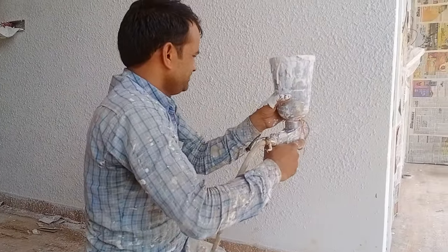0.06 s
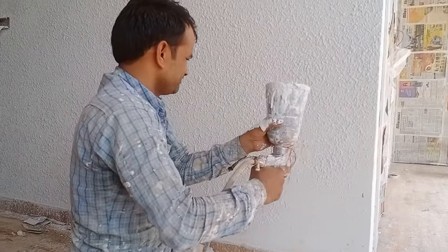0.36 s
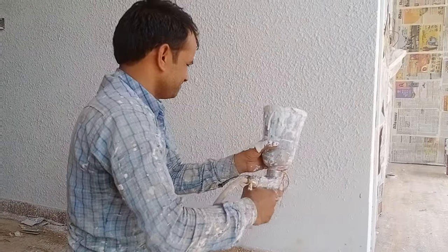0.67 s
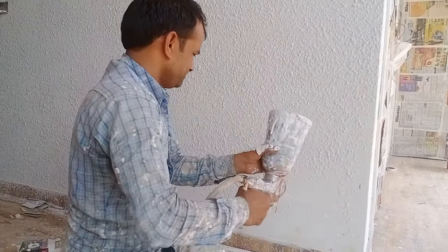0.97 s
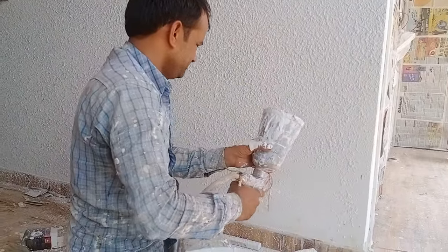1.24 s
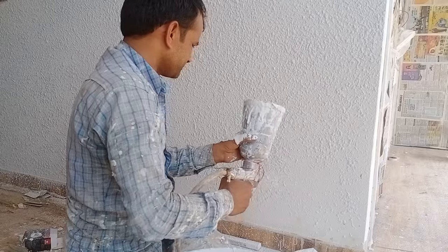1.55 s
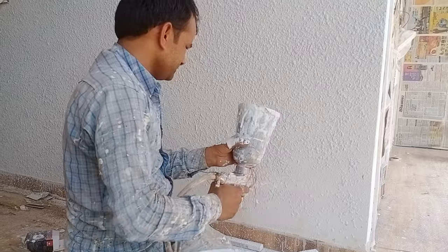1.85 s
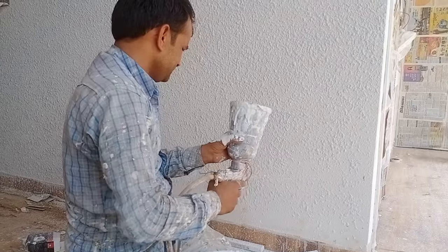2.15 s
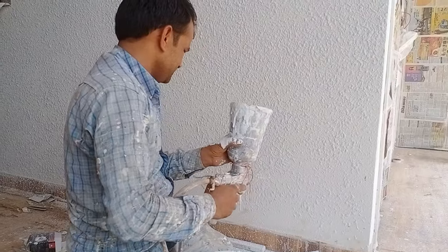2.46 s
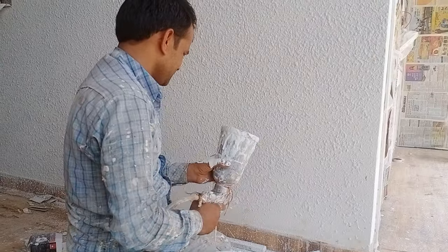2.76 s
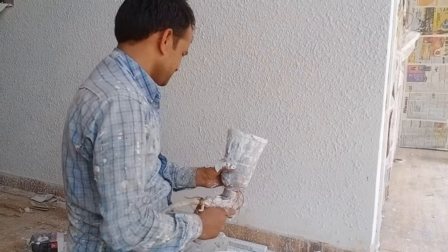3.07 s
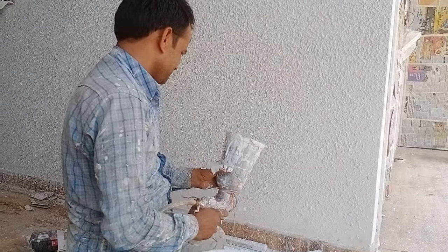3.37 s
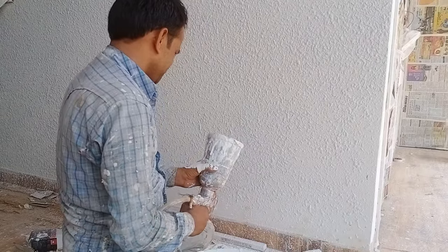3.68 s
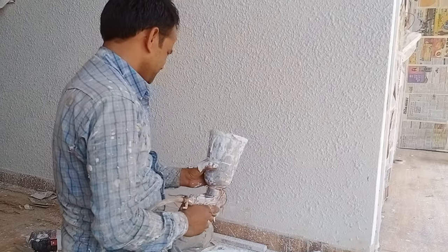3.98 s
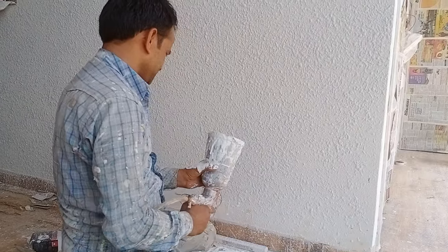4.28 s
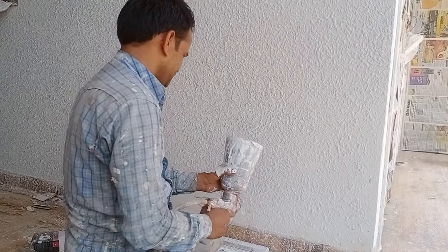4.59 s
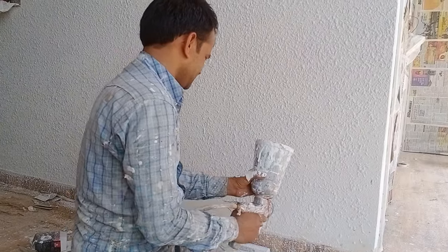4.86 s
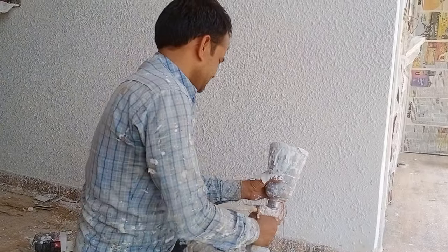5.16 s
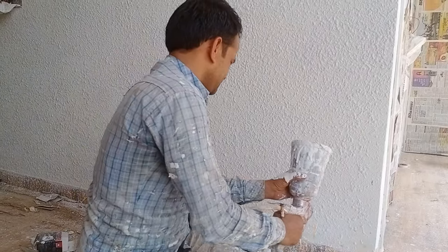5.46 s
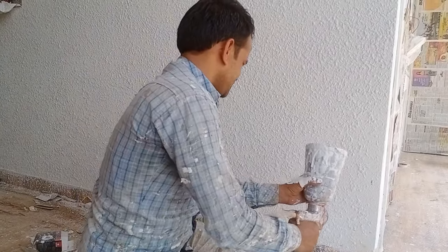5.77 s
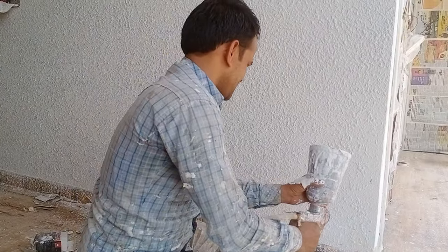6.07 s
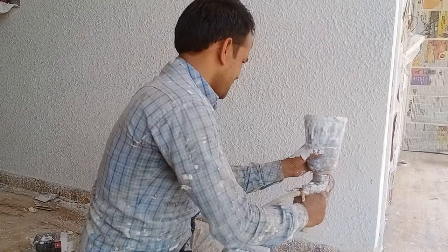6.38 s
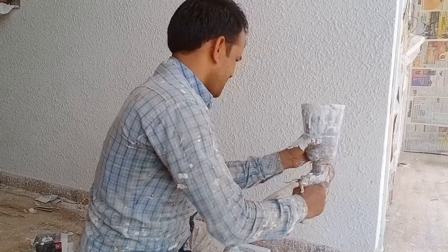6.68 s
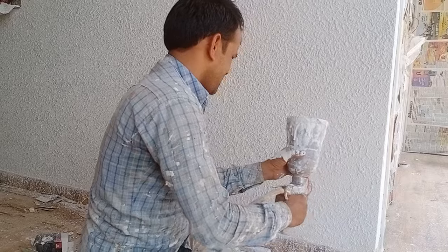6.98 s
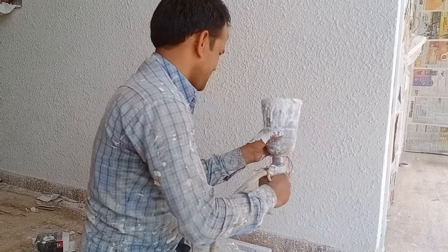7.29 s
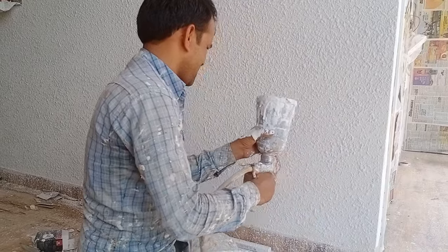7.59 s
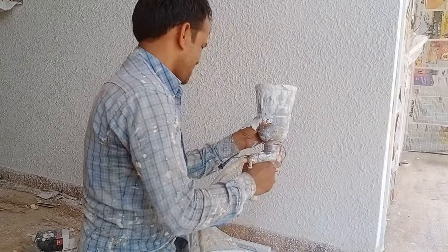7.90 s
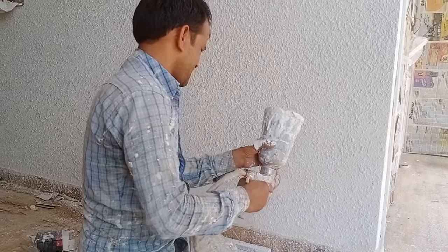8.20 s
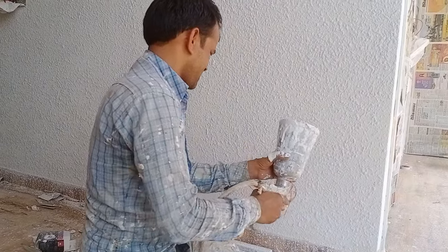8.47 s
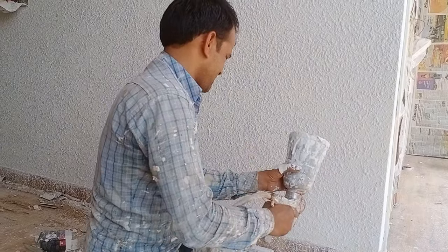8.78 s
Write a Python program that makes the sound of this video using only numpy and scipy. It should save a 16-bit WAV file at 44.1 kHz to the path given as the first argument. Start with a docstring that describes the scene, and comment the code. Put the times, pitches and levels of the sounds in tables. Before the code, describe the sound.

Continuous close hiss of an air spray gun coating a wall, its tone shifting over a faint low roar.

```python
"""A hopper gun blows wet wall texture onto a porch wall with compressed air, in one unbroken blast.
The jet hisses and sputters as lumps of paste pass the nozzle. Close echoes and ringing tones shift as
the gun sweeps down the wall and up again. Behind it, the spray roars on the wall, the porch booms
faintly and a draught rumbles past the one nearby microphone."""
import sys
import numpy as np
from scipy import signal
from scipy.fft import rfft, irfft, next_fast_len
from scipy.io import wavfile

SR = 44100
rng = np.random.default_rng(int(sys.argv[2]) if len(sys.argv) > 2 else 0)


def waveform_to_disk(signal):
    """Save audio, clipped to [-1, 1], as 16-bit WAV at the path in sys.argv[1]."""
    frames = np.transpose(np.atleast_2d(signal))
    scaled = np.clip(frames, -1, 1) * 32767
    samples = np.round(scaled).astype(np.int16)
    wavfile.write(sys.argv[1], SR, samples)


N = 389844
TIME = np.arange(N) / SR

# the gun's sweep down and up the wall: (time [s], height [m])
GUN_HEIGHT = [(0, 0.395), (.5, 0.382), (1, 0.205), (2, 0.311), (3, 0.219), (4, 0.067), (5, 0.03),
              (6, 0.024), (6.5, 0.156), (7, 0.224), (8, 0.233), (8.84, 0.11)]


def from_db(db):
    """Turn decibels into a number to multiply a sound by."""
    return np.exp(np.asarray(db) * (np.log(10) / 20))


def rms_one(x):
    """Scale a signal so that its average strength (rms) is 1."""
    return x / np.sqrt(np.mean(x ** 2) + 1e-20)


def in_time(rows):
    """Join a table's points with straight lines: one curve for each column after the time."""
    times, *columns = np.transpose(rows)
    return [np.interp(TIME, times, column) for column in columns]


def swell(middle_s, length_s):
    """A smooth rise to 1 and fall again."""
    return np.exp(-2 * np.minimum(((TIME - middle_s) / length_s) ** 2, 20))


def drift(rate_hz):
    """A smooth random wobble of typical size 1; a higher rate makes it quicker."""
    step, warm_up = 40, 2000
    r = np.exp(-2 * np.pi * step * rate_hz / SR)
    noise = rng.standard_normal(N // step + warm_up + 2)
    slow = signal.lfilter([1], [1, -2 * r, r * r], noise)[warm_up:]
    return np.interp(np.arange(N) / step, np.arange(len(slow)), rms_one(slow))


def filtered(x, gain_at):
    """Turn each frequency of x up or down by gain_at(frequency in Hz)."""
    size = next_fast_len(N + SR // 10)
    hz = np.arange(size // 2 + 1) * SR / size
    return irfft(rfft(x, size) * gain_at(hz), size)[:N]


def coloured(x, spectrum):
    """Give x the tone colour in a table, with nothing beyond its ends; strength 1."""
    hz, db = np.transpose(spectrum)
    shaped = filtered(x, lambda f: from_db(np.interp(np.log(f + 1), np.log(hz), db, -np.inf, -np.inf)))
    return rms_one(shaped)


def blown(hz, width_hz):
    """Rushing air makes something ring: noise around one pitch, purer when narrow; strength 1."""
    r = np.exp(-np.pi * width_hz / SR)
    band = [1 - r, 0, r - 1, 1, -2 * r * np.cos(2 * np.pi * hz / SR), r * r]
    return rms_one(signal.sosfilt([band, band], rng.standard_normal(N + SR // 2))[-N:])


def wall_wash(waver_db, gust_db, puff_boom_db):
    """The jet roars on the wall, sets the porch booming and sends a draught past the microphone."""
    # the jet on the wall: (time [s], roar [dB], lowest porch note [dB], upper porch notes [dB])
    wash_levels = [(0, -26, -38.5, -34), (.9, -27.5, -44.5, -32), (2.3, -27.5, -46, -32),
                   (2.6, -28, -52, -38.5), (4.2, -30.5, -51, -39.5), (5.2, -28.5, -49.5, -42.5),
                   (6.8, -28, -45.5, -37), (8.0, -29, -39.5, -37), (8.84, -28.5, -48, -37.5)]
    # tone colour of the roar: (frequency [Hz], relative level [dB])
    roar_colour = [(165, -29), (195, -2.5), (330, -2.5), (430, -4.5), (600, -4.5), (900, -1), (1100, 0.5),
                   (1350, 3), (1600, 2), (1900, -0.5), (2150, -17), (2600, -36)]
    # notes of the air in the porch, lowest first: (pitch [Hz], width [Hz], relative level [dB])
    porch_notes = [(190.1, 11.3, 1.5), (249.6, 13.6, -2), (304.6, 17.5, -6)]
    # rumble of the draught: (time [s], level [dB])
    draught_levels = [(0, -54.2), (2.2, -53), (2.6, -64), (4.4, -61), (5.1, -57), (8.84, -57)]
    # puffs of air thrown back by the wall: (middle [s], length [s], rumble level [dB])
    air_puffs = [(.19, 0.1, -51), (1.348, .13, -55), (2.03, 0.067, -57), (2.994, 0.059, -56),
                 (3.447, 0.045, -58), (3.8, 0.14, -45), (5.63, 0.11, -51), (6.463, 0.081, -50),
                 (7.04, 0.044, -54), (7.433, 0.075, -50), (7.853, .1, -55), (8.249, 0.088, -51)]
    # tone colour of the rumble: (frequency [Hz], relative level [dB])
    rumble_colour = [(20, -24), (45, -11), (62, -9.5), (91, 7), (115, 2), (145, 0), (200, -8)]
    roar_db, lowest_db, upper_db = in_time(wash_levels)
    draught_db, = in_time(draught_levels)
    puffs = sum(from_db(db) * swell(s, length) for s, length, db in air_puffs)
    roar_db = roar_db + waver_db * drift(rate_hz=6.6)   # the jet crosses rough plaster
    roar = from_db(roar_db) * coloured(rng.standard_normal(N), roar_colour)
    lowest, *upper = [from_db(db) * blown(hz, width) for hz, width, db in porch_notes]
    lowest_gain = from_db(lowest_db) + from_db(puff_boom_db) * puffs   # each puff lifts the lowest note
    boom = lowest_gain * lowest + from_db(upper_db) * sum(upper)
    gusts = rng.standard_normal(N) * from_db(gust_db * drift(rate_hz=18))
    rumble = (from_db(draught_db) + puffs) * coloured(gusts, rumble_colour)
    return roar + boom + rumble


def gun_rings():
    """The gun and its hopper ring faintly and steadily in the stream of air."""
    # notes of gun and hopper: (pitch [Hz], width [Hz], level [dB])
    notes = [(430.2, 15.4, -46.5), (504.4, 20, -51), (624, 8.7, -55), (806, 35, -45), (907, 18, -44),
             (997, 20, -46.5), (1165, 17, -44), (1699, 11, -42.5), (2088, 27, -43.5), (2464, 31, -41.5),
             (3208, 67, -42)]
    return sum(from_db(db) * blown(hz, width) for hz, width, db in notes)


def gap_tones(level_db, fade_s):
    """The gap between painter, gun and wall rings with different notes as each pose comes and goes."""
    # four poses (gun high, tucked in low, reaching out, drawing back):
    # (start [s], end [s], list of (pitch [Hz], width [Hz], relative level [dB]))
    poses = [ (-.5, 2.5, [(400, 110, -39), (696, 140, -39), (1045, 150, -33), (1266, 57, -34),
             (1670, 110, -42), (2480, 200, -34), (3200, 1500, -32.5)]), (2.751, 5.13, [(330, 96, -39),
             (503, 220, -40.5), (795, 75, -38.5), (1285, 130, -38.5), (1517, 45, -36.5), (1743, 110, -33),
             (3030, 230, -32), (4130, 220, -36), (4750, 300, -37), (6350, 300, -36)]),
             (5.55, 8.17, [(1187, 94, -33), (2400, 200, -42), (3230, 300, -34.5), (4150, 250, -38),
             (5680, 200, -37), (6530, 590, -34)]), (8.2, 9.1, [(1180, 200, -34), (1540, 120, -40),
             (4020, 250, -35), (5700, 200, -33), (6300, 220, -31)])]
    out = 0
    for start, end, notes in poses:
        held = (np.tanh((TIME - start) / fade_s) - np.tanh((TIME - end) / fade_s)) / 2
        out = out + held * sum(from_db(db + level_db) * blown(hz, width) for hz, width, db in notes)
    return out


def flares():
    """One pitch rises and fades in the hiss as the gun passes the spot that makes it ring."""
    # passing tones: (middle [s], length [s], pitch [Hz], width [Hz], top level [dB])
    tones = [(.48, 0.26, 1750, 220, -27.5), (1.43, .12, 4930, 700, -29), (2.53, .09, 6120, 400, -24),
             (2.78, .12, 4100, 600, -25), (3.46, .18, 2930, 250, -27.5), (3.95, .2, 6350, 250, -31),
             (4.3, 1.1, 8060, 1300, -37), (4.42, .22, 6420, 250, -29), (4.48, .2, 7500, 500, -34),
             (5.15, 0.7, 6380, 380, -28.5), (5.3, 0.8, 1250, 220, -33), (4.1, 1.2, 796, 80, -38),
             (6.35, 1.15, 1200, 90, -33), (5.82, .14, 6780, 250, -31), (7.22, 0.15, 3250, 400, -24),
             (7.32, .1, 12000, 2000, -30), (7.52, .4, 3480, 420, -28), (8.05, .35, 2570, 200, -29),
             (8.3, .14, 3950, 500, -28.5), (8.65, .35, 6600, 500, -28)]
    return sum(from_db(db) * swell(s, length) * blown(hz, width) for s, length, hz, width, db in tones)


def near_echoes(x, echoes_db, decay_ms, ms_per_m, flicker_db, count):
    """Wall, floor and painter add weak echoes that follow the gun, so ripples slide through the hiss."""
    # the gun's travel along the wall: (time [s], position [m])
    gun_sideways = [(0, .21), (1, .19), (2, .07), (3, .04), (4, 0), (4.5, .02), (5, .17), (6, .34),
                    (7, .25), (8, .16), (8.84, .25)]
    height, = in_time(GUN_HEIGHT)
    sideways, = in_time(gun_sideways)
    up_m, along_m = height - height.mean(), sideways - sideways.mean()
    delays_ms = np.geomspace(2.5, 16, count) * rng.uniform(.95, 1.05, count)
    gains = from_db(echoes_db) * rms_one(np.exp(-delays_ms / decay_ms)) / np.sqrt(count)
    out = x
    for delay_ms, gain, angle in zip(delays_ms, gains, rng.uniform(0, 2 * np.pi, count)):
        moved_m = np.cos(angle) * up_m + np.sin(angle) * along_m
        sent_s = TIME - (delay_ms + ms_per_m * moved_m) / 1000
        # the wavering jet aims more or less of its sound down each path
        aim = rms_one(from_db(flicker_db * np.tanh(drift(rate_hz=3.2))))
        out = out + gain * aim * np.interp(sent_s, TIME, x, left=0)
    return rms_one(out) * np.std(x)


def swirl(x, level_db, above_hz, count):
    """Hopper, hands and sleeve bounce the treble back; the tone swirls as the gun wobbles."""
    treble = filtered(x, lambda f: .5 + .5 * np.tanh((f - above_hz) / 2000))
    lags = (np.geomspace(.7, 2.6, count) * SR / 1000).astype(int)   # 0.7 to 2.6 ms late
    bounces = sum(drift(rate_hz=2.2) * np.pad(treble, (lag, 0))[:N] for lag in lags)
    return rms_one(x + from_db(level_db) * bounces / np.sqrt(count)) * np.std(x)


def nozzle_rasp(swing_db, rate_hz, threshold, height_db_per_m):
    """Hoarse tones catch for moments on the nozzle's wet rim, louder with the gun held low."""
    # tones of the nozzle: (pitch [Hz], width [Hz], level at average gun height [dB])
    tones = [(3300, 1550, -36), (5750, 650, -32), (6420, 830, -34)]
    height, = in_time(GUN_HEIGHT)
    out = 0
    for hz, width, db in tones:
        tone = blown(hz, width)
        catch = np.tanh(drift(rate_hz) - threshold)   # a higher threshold makes catches rarer
        out = out + from_db(db) * rms_one(tone * from_db(swing_db * catch))
    return out * from_db(height_db_per_m * (height - height.mean()))


def spray(drops_per_s, drops_db):
    """Smooth air noise plus the ticks of paste drops torn off at the nozzle."""
    sizes = rng.uniform(-1, 1, N)
    drops = rms_one(sizes * (rng.random(N) < drops_per_s / SR))
    return rng.standard_normal(N) + from_db(drops_db) * drops


def beamed_sizzle(beam_above_hz):
    """The jet's highest sizzle leaves the nozzle as a narrow beam, which turns with the gun."""
    # tone colour of the sizzle: (frequency [Hz], relative level [dB])
    sizzle_colour = [(8800, -34), (9400, -15.5), (9900, -10), (10350, -12), (10900, -6), (11350, -9.5),
                     (12200, -0.2), (13000, -0.5), (13550, -1.5), (14000, 0.2), (15500, -0.6)]
    # how squarely the beam meets the microphone: (time [s], aim [higher is more direct])
    beam_aim = [(0, -2), (1, -1.6), (2, -1.6), (3, 1.2), (4, 3.2), (4.7, 3.2), (5.5, .6), (6.3, 0),
                (7, -.4), (8, -.4), (8.84, -1.6)]
    aim, = in_time(beam_aim)
    sizzle = coloured(rng.standard_normal(N), sizzle_colour)
    beam = filtered(sizzle, lambda f: .5 + .5 * np.tanh((f - beam_above_hz) / 500))
    # a more direct aim lifts the beam and softens the sizzle below it
    return beam * from_db(0.68 * aim) + (sizzle - beam) * from_db(-0.22 * aim)


def jet(hiss_db, sizzle_db, feed_db, sputter_db, height_db_per_m):
    """The air jet hisses and sizzles; both sputter together as the paste feeds unevenly."""
    # big lumps choke and clear the nozzle: (middle [s], length [s], hiss change [dB], sizzle change [dB])
    lumps = [(0.197, 0.044, -2.5, -1), (1.09, .07, -1, -1), (1.44, 0.12, 1.5, -0.5),
             (1.858, 0.052, 2, -2.2), (2.076, 0.052, 2, -1), (3.293, 0.17, 1.5, 0),
             (3.797, 0.048, -3.5, -1), (3.88, .06, 0.5, 2), (5.328, 0.051, -1.2, -3),
             (5.532, 0.12, -1, 0.5), (5.88, 0.06, -1.5, -1), (6.117, 0.1, -1, -1.5), (6.21, 0.043, 0, 3),
             (8.32, 0.042, 2.5, -2)]
    # tone colour of the hiss: (frequency [Hz], relative level [dB])
    hiss_colour = [(1500, -54), (1850, -6), (2100, -3), (2500, -0.5), (3000, 1.5), (3500, 1), (4100, -1.5),
                   (4850, -4), (5800, -6), (6600, -6.5), (7200, -9), (8400, -15), (9250, -21.5),
                   (11000, -64)]
    height, = in_time(GUN_HEIGHT)
    uneven_db = feed_db * drift(rate_hz=11) + sputter_db * drift(rate_hz=160)
    hiss = coloured(spray(drops_per_s=700, drops_db=-9.5), hiss_colour)
    sizzle = beamed_sizzle(beam_above_hz=13700)
    hiss_db += height_db_per_m * (height - height.mean())   # louder held high, clear of the body
    hiss_db += sum(db * swell(s, length) for s, length, db, _ in lumps)
    sizzle_db += sum(db * swell(s, length) for s, length, _, db in lumps)
    # each also flutters on its own, the hiss only barely
    hiss_db -= 0.05 * drift(rate_hz=64)
    sizzle_db += 0.66 * drift(rate_hz=37)
    return hiss * from_db(hiss_db + uneven_db) + sizzle * from_db(sizzle_db + uneven_db)


def scene():
    """The jet and its echoes, over the ringing tones and the wash from the wall; both channels alike."""
    gun = jet(hiss_db=-19.5, sizzle_db=-25.5, feed_db=0.45, sputter_db=0.76, height_db_per_m=1.5)
    gun = gun + nozzle_rasp(swing_db=10.0, rate_hz=59, threshold=0.42, height_db_per_m=-2.5)
    gun = swirl(gun, level_db=-14.5, above_hz=3500, count=8)
    gun = near_echoes(gun, echoes_db=-4.0, decay_ms=310, ms_per_m=2.483, flicker_db=5.5, count=16)
    tones = gun_rings() + gap_tones(level_db=-1.0, fade_s=0.26) + flares()
    mono = gun + tones + wall_wash(waver_db=1.1, gust_db=3.0, puff_boom_db=5)
    return np.array([mono, mono])


def record(dry):
    """Cut the very highest treble steeply."""
    cutoff_hz = 15560
    return signal.sosfilt(signal.ellip(14, .1, 90, cutoff_hz, fs=SR, output="sos"), dry)


dry = scene()
out = record(dry)
waveform_to_disk(out)
```